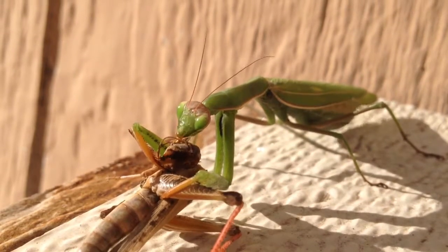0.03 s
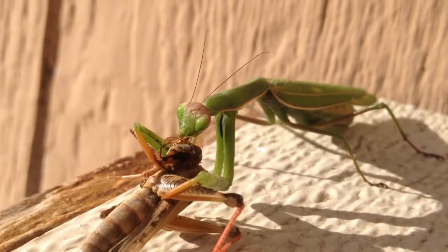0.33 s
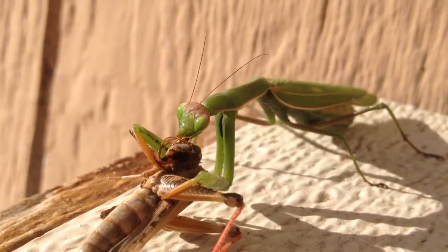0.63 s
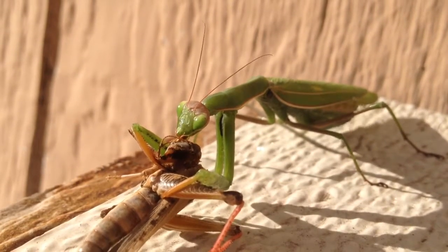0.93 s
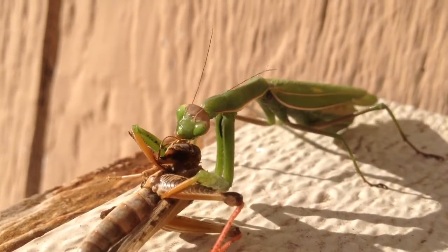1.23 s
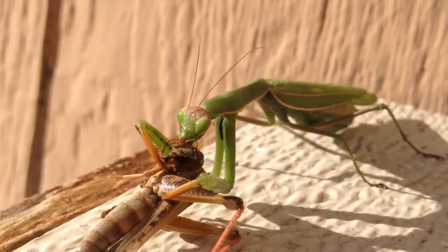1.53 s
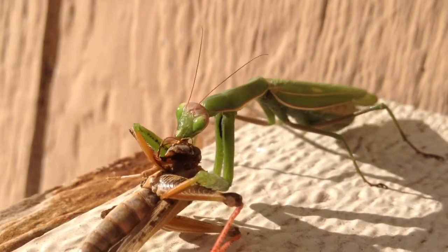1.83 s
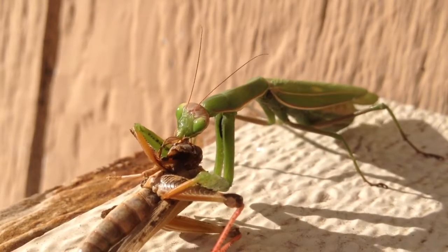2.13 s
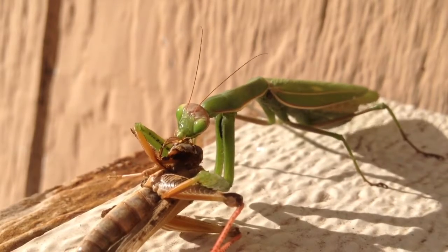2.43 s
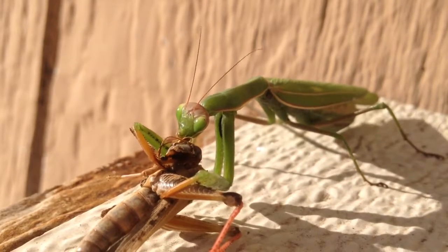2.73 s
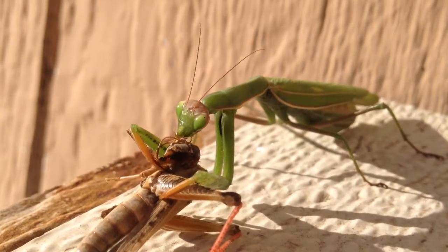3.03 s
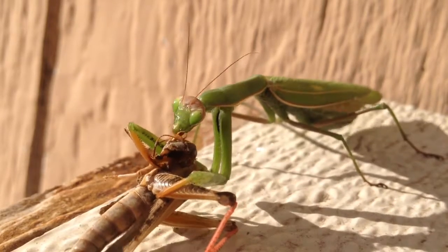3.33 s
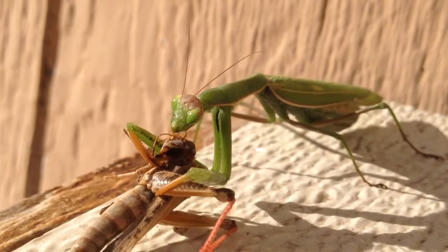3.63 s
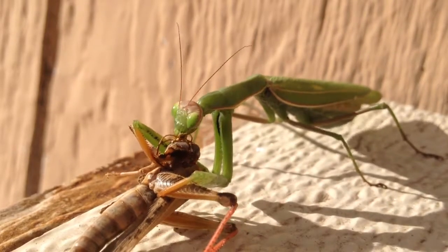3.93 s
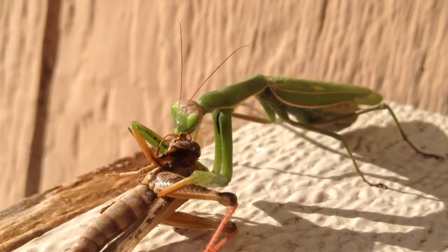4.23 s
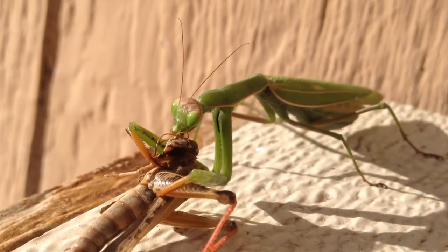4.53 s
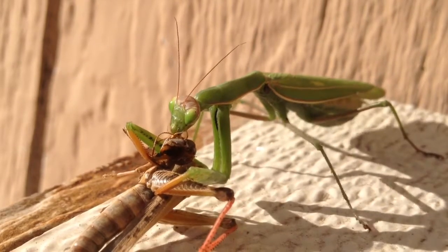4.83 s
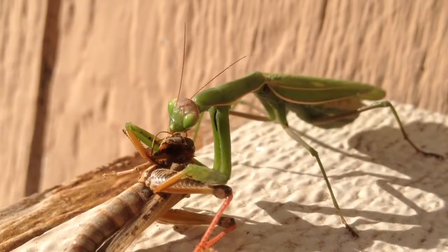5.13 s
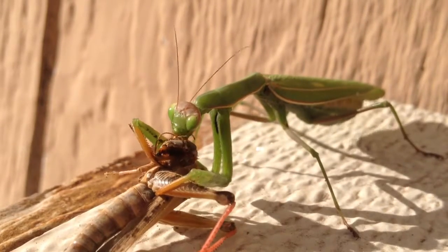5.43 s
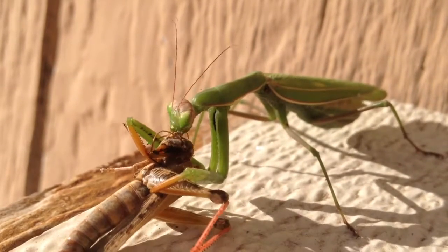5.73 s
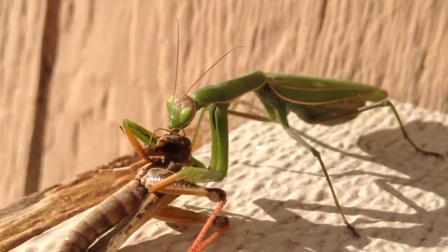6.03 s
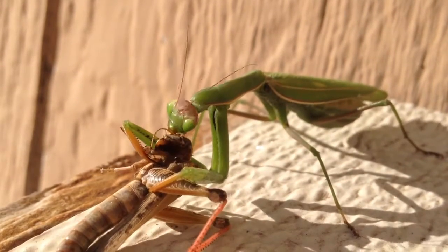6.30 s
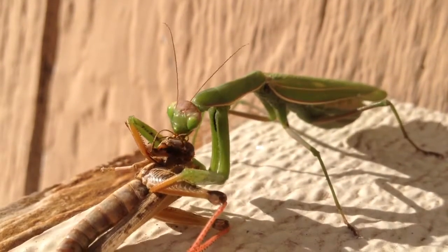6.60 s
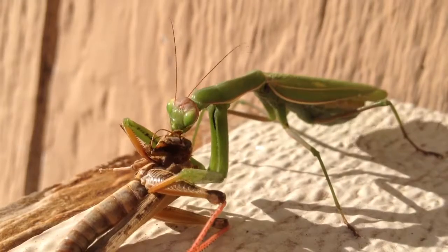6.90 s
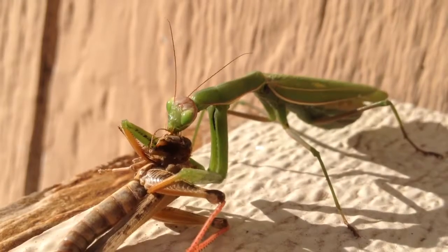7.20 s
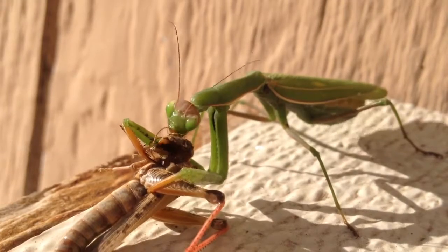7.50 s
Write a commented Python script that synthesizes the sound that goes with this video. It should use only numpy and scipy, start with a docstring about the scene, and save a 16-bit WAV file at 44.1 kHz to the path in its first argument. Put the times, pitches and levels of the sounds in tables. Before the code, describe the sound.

Two soft, low thumps on the microphone stand out over a faint outdoor traffic rumble, with barely audible birds and a distant engine.

```python
"""Distant traffic rumbles in a quiet garden by a house wall; a far engine swells into a hum.
Far birds chirp, heard only as echoes; a nearer one gives a falling whistle whose accent rings back.
Two soft thumps and a few light finger rubs reach the microphone through the camera body.
The preamplifier hisses throughout."""
import sys
import numpy as np
from scipy import signal
from scipy.fft import rfft, irfft, next_fast_len
from scipy.io import wavfile
from scipy.ndimage import map_coordinates

SR = 44100
rng = np.random.default_rng(int(sys.argv[2]) if len(sys.argv) > 2 else 0)


def store_pcm(level_fs):
    """Save levels as 16-bit WAV."""
    pcm = np.round(np.clip(level_fs, -1, 1) * 32767).astype(np.int16)
    wavfile.write(sys.argv[1], SR, np.atleast_2d(pcm).T)


N = 333396
TIME_S = np.arange(N) / SR


def amp(db):
    """Decibels to gain."""
    return 10 ** (np.asarray(db) / 20)


def along(points, hz):
    """(Hz, value) points read on a log frequency axis."""
    knots_hz, values = np.transpose(points)
    return np.interp(np.log(hz + 1), np.log(knots_hz + 1), values)


def wobble(rate_hz):
    """Smooth random curve, rate_hz knots a second."""
    knots = rng.standard_normal(int(N * rate_hz / SR) + 4)
    return map_coordinates(knots, [np.arange(N) * rate_hz / SR])


def filtered(x, response):
    """Apply a complex frequency response to x."""
    size = next_fast_len(N + SR // 2)
    return irfft(rfft(x, size) * response(np.fft.rfftfreq(size, 1 / SR)), size)[:N]


def noise(spectrum):
    """Coloured noise, rms 1."""
    x = filtered(rng.standard_normal(N), lambda hz: amp(along(spectrum, hz)))
    return x / np.sqrt(np.mean(x ** 2) + 1e-20)


def tone(hz):
    """Sine along a pitch curve, rms 1."""
    return np.sqrt(2) * np.sin(2 * np.pi * (np.cumsum(hz) / SR + rng.random()))


def swell(centre_s, length_s, peak_db=0):
    """Bell-shaped envelope."""
    return amp(peak_db) * np.exp(-2 * ((TIME_S - centre_s) / length_s) ** 2)


def spring(hz, resonance_hz, width_hz):
    """Response of a damped mass on a spring."""
    return resonance_hz ** 2 / (resonance_hz ** 2 - hz ** 2 + 1j * hz * width_hz)


def preamp_hiss(level_db=-74):
    """Steady broadband noise of the preamplifier."""
    # hiss spectrum (frequency [Hz], relative density [dB])
    spectrum = [(200, -17.5), (1400, 2.5), (2800, 0.5), (4500, -1.5), (6500, -4.5), (8300, -8.5),
                (9900, -10.5), (11600, -7.5), (13300, -3.5), (15300, -4)]
    return amp(level_db) * noise(spectrum)


def traffic(start_db=-61, rise_db_per_s=0.13, drift_db=0.17, flutter_db=0.57):
    """Far roads, treble lost on the way: a steady roar that grows a little."""
    # roar spectrum (frequency [Hz], relative density [dB])
    roar = [(22, -41.5), (45, -32), (72, -24.5), (87, -13.5), (104, -13.5), (130, -7), (178, 1),
            (275, -6.5), (368, 0.5), (410, -9), (490, -10.5), (680, -16), (920, -18.5), (1400, -32),
            (3000, -42), (8000, -89)]
    level_db = start_db + rise_db_per_s * TIME_S - drift_db * wobble(2.6) + flutter_db * wobble(13)
    return amp(level_db) * noise(roar)


def engine(mean_cycle_hz=43.2, firings=4, waver_hz=0.15, floor_db=-74, fading_db=2, flutter_db=1.5):
    """Firings at a steady speed give the hum; moving air fades the weaker tones one by one."""
    # swells of the firing tone (centre [s], length [s], peak [dB])
    hum_swells = [(4.02, 0.27, -67.5), (5.65, 0.33, -64), (6.082, 0.29, -58), (6.64, 0.35, -55.5),
                  (7.26, .13, -56), (7.5, 0.27, -61.5)]
    # weaker tones (multiple of the cycle rate, relative level [dB])
    partials = [(5, -2), (6, -1.5), (7.35, -8), (8.5, -9.5)]
    # exhaust rush spectrum (frequency [Hz], relative density [dB])
    exhaust = [(100, -31), (260, 1), (480, 2), (760, -10), (1300, -26.5), (6000, -88)]
    cycle_hz = mean_cycle_hz + waver_hz * wobble(7)
    envelope = amp(floor_db) + sum(swell(*row) for row in hum_swells)
    hum = envelope * amp(flutter_db * wobble(12)) * tone(firings * cycle_hz)
    overtones = sum(amp(db + fading_db * wobble(7)) * tone(k * cycle_hz) for k, db in partials)
    overtones *= swell(centre_s=6.99, length_s=1.0, peak_db=-63)
    rush = swell(centre_s=6.94, length_s=0.98, peak_db=-65) * noise(exhaust)
    return hum + overtones + rush


def garden_echo(x):
    """Walls and trees answer with a diffuse tail."""
    # reverberation (frequency [Hz], t60 [s])
    decay = [(300, .3), (3000, 0.55), (9000, 0.16)]
    hz, age_s, spectra = signal.stft(rng.standard_normal(SR // 2), SR, nperseg=256)
    t60_s = along(decay, hz)[:, None]
    _, tail = signal.istft(spectra * amp(-60 * age_s / t60_s), SR, nperseg=256)
    return signal.fftconvolve(x, tail / np.linalg.norm(tail))[:N]


def far_notes(length_s=0.17, warble=0.06):
    """Far birds' short notes, and the near whistle's accent ringing back at 7.26 s."""
    # warbling notes (time [s], pitch [Hz], level [dB])
    notes = [(2.35, 2850, -86.5), (2.9, 2910, -86), (4.7, 3140, -89), (5.87, 2940, -85.5),
             (6.38, 2780, -86), (6.55, 2740, -88), (7.26, 3010, -89)]
    bend = 1 + warble * wobble(400)
    return sum(swell(s, length_s, db) * tone(hz * bend) for s, hz, db in notes)


def bird_whistle(source_db=-79, accent_db=9, edge_s=0.01, quaver=0.007, flutter_db=1):
    """A falling note, accented just before its final flick; the throat shapes both harmonics."""
    # pitch contour (time [s], pitch [Hz])
    contour = [(6.935, 1900), (6.957, 2170), (6.997, 1850), (7.045, 1720), (7.12, 1555), (7.152, 1360),
               (7.163, 980)]
    # throat resonance (frequency [Hz], gain [dB])
    throat = [(1400, -7), (1650, -8), (2100, -1.5), (2800, -2), (3700, -5.5), (4200, -16)]
    knots_s, knots_hz = np.transpose(contour)
    hz = np.interp(TIME_S, knots_s, knots_hz) * (1 + quaver * wobble(120))
    gate = np.clip(np.minimum(TIME_S - knots_s[0], knots_s[-1] + edge_s - TIME_S) / edge_s, 0, 1)
    accent = swell(centre_s=7.145, length_s=0.017)
    effort_db = source_db + accent_db * accent + flutter_db * wobble(60)
    harmonics = sum(amp(along(throat, k * hz)) * tone(k * hz) for k in (1, 2))
    return gate * amp(effort_db) * harmonics


def handling(length_s=0.027, crest_db=7):
    """Fingers shift on the camera with short, dull rubs."""
    # rubs (time [s], approximate peak [dB])
    rubs = [(.115, -47), (.178, -44.5), (.737, -48.5), (.79, -50), (4.533, -58), (7.33, -54.5)]
    # rub spectrum (frequency [Hz], relative density [dB])
    spectrum = [(25, -34), (60, -7), (110, 1.5), (170, 7.5), (260, -5), (600, -40), (2500, -90)]
    return sum(swell(s, length_s, db - crest_db) for s, db in rubs) * noise(spectrum)


def thumps(low_cut_hz=106, tick_rise_s=0.0028):
    """Soft contacts push the damped camera body and tick its casing; a low cut thins the bass."""
    # contacts (time [s], thud peak [dB], resonance [Hz], width [Hz], tick gain [dB])
    contacts = [(2.9305, -16, 322, 175, -36), (5.6223, -15.5, 447, 269, -58)]
    # camera body resonances (frequency [Hz], width [Hz])
    body_modes = [(142, 63), (223, 118)]
    # casing modes (frequency [Hz], t60 [s])
    casing_modes = [(760, 0.02), (1020, 0.013)]
    body = lambda f: np.prod([1j * f / hz * spring(f, hz, width) for hz, width in body_modes], axis=0)
    mic_low_cut = lambda f: -(f / low_cut_hz) ** 2 * spring(f, low_cut_hz, np.sqrt(2) * low_cut_hz)
    out = np.zeros(N)
    for start_s, peak_db, contact_hz, width_hz, tick_db in contacts:
        push = signal.unit_impulse(N, round(start_s * SR))
        thud = filtered(push, lambda f: spring(f, contact_hz, width_hz) * body(f) * mic_low_cut(f))
        age_s = np.maximum(TIME_S - start_s, 0)
        ring = sum(np.sin(2 * np.pi * hz * age_s) * amp(-60 * age_s / t60) for hz, t60 in casing_modes)
        tick = ring * (1 - np.exp(-age_s / tick_rise_s))
        out += amp(peak_db) * thud / np.abs(thud).max() + amp(tick_db) * tick
    return out


def scene(whistle_echo_db=-3):
    """All sources at one microphone; the far notes arrive only as echoes."""
    near_bird = bird_whistle()
    outdoors = traffic() + engine() + near_bird
    echoes = garden_echo(amp(whistle_echo_db) * near_bird + far_notes())
    return (outdoors + echoes + thumps() + handling() + preamp_hiss())[None]


def record(dry, top_hz=15480):
    """The camera keeps nothing above its band limit."""
    return filtered(dry[0], lambda hz: hz < top_hz)[None]


dry = scene()
out = record(dry)
store_pcm(out)
```